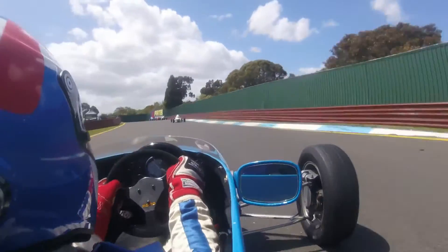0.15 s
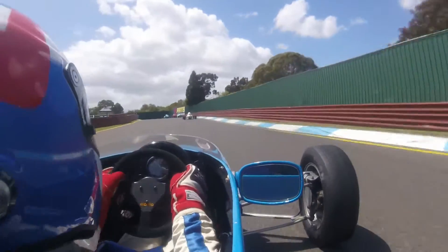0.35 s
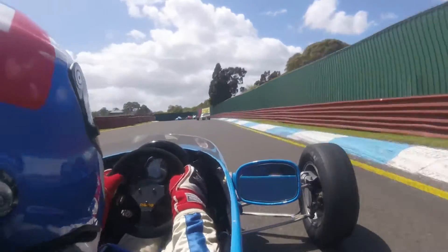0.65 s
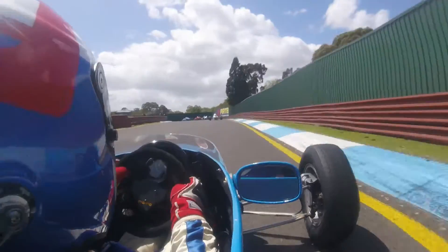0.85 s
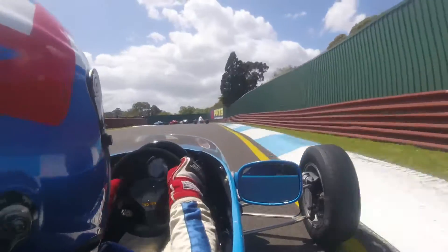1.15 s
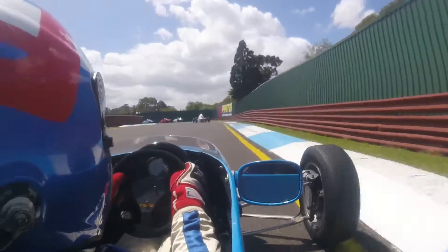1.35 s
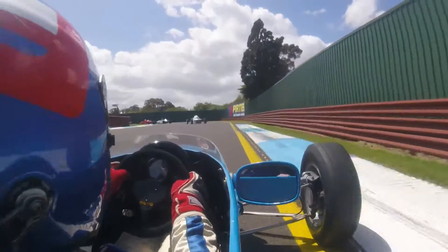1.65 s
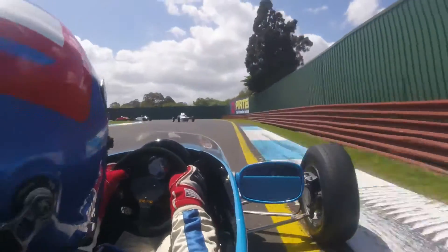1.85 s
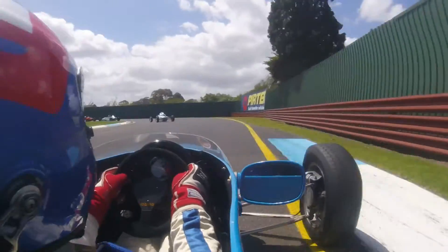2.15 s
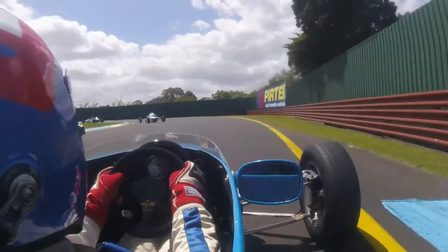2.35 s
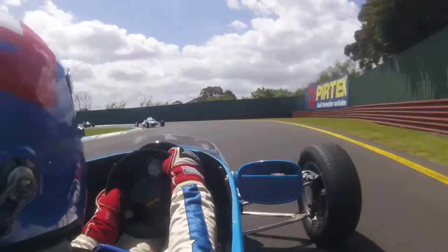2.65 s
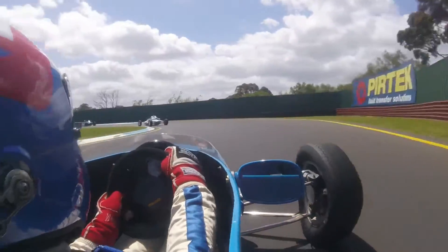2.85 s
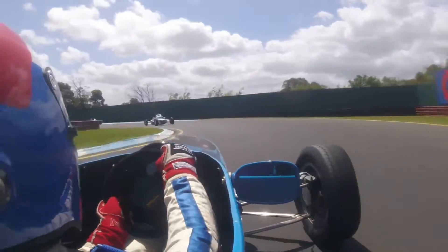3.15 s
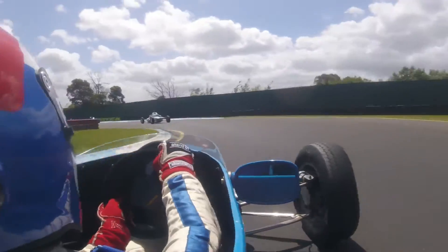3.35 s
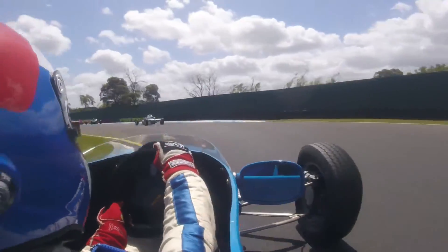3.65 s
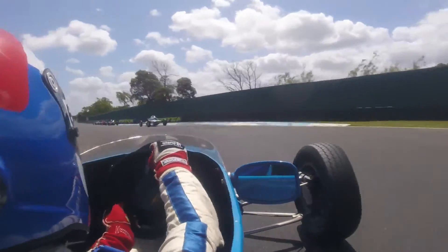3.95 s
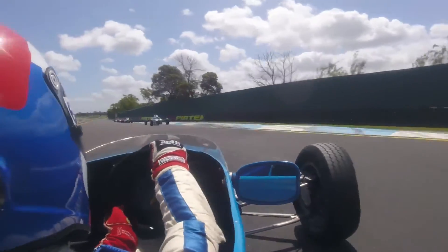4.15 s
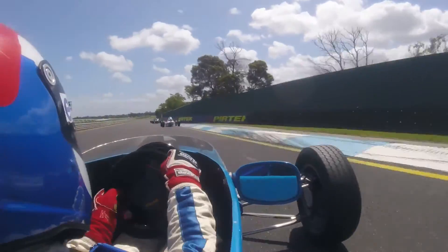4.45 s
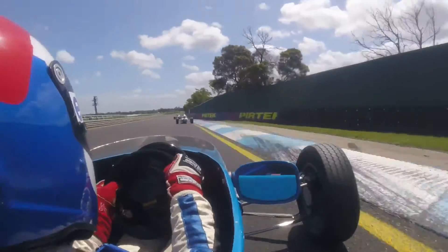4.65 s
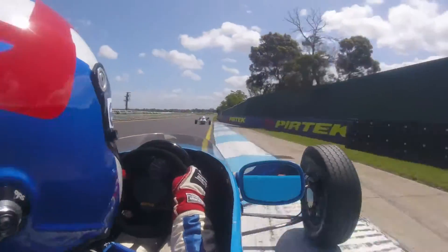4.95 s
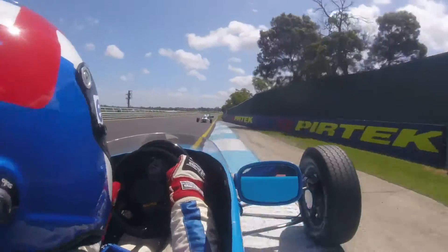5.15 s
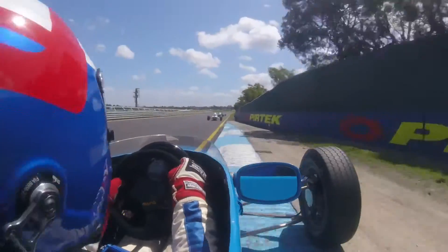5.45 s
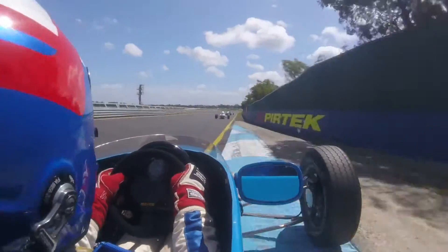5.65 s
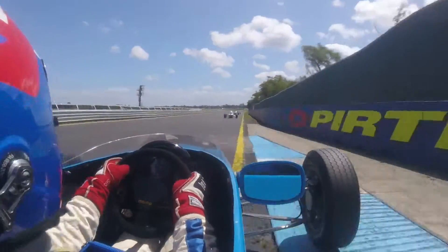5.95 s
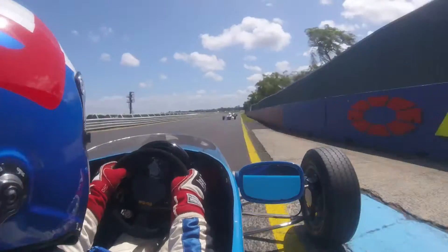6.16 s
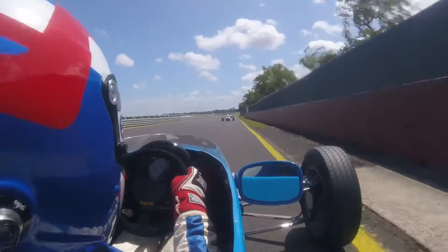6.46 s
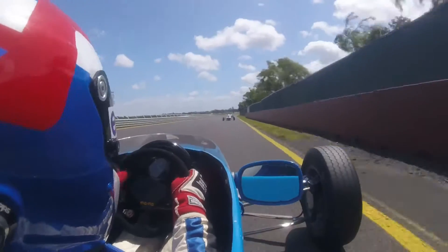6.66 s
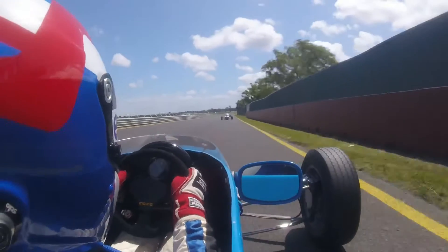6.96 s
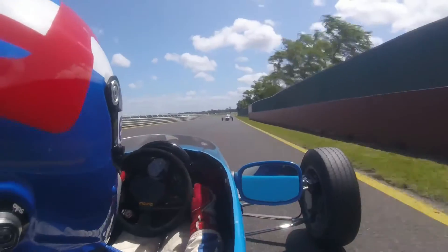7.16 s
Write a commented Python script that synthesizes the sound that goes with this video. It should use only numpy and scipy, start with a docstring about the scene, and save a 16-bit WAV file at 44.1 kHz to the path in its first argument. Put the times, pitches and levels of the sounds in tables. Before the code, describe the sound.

From a microphone on the car behind the driver, a dense engine drone dominates, with valve clatter, wind and tyre rush. Revs drop into a burbling lull, recover and hold through the bend, then pull upward unevenly. Rough kerb bursts and dull thuds shake the chassis before the smoother straight, where a thin high whistle strengthens.

```python
"""Cockpit of a four-cylinder open-wheel racing car: into a bend, out over the kerb, onto the straight.
From the start: exhaust boom at the firing rate, fluttering in the airstream, with the engine's other orders;
noise bands for valve clatter, wind and rush; a faint resonant whistle. As the revs fall, random pops burble in
the pipe. Pulling out, one gear tone whines; clicks ring chassis modes as knocks; noise bursts make the kerb's
rumble and howl. Last, the whistle swells."""
import sys
import numpy as np
from scipy import signal
from scipy.io import wavfile

SR = 44100
rng = np.random.default_rng(int(sys.argv[2]) if len(sys.argv) > 2 else 0)


def unload_wav(signal):
    """Save mono or channel-first audio to the path in sys.argv[1] as 16-bit WAV at rate SR, clipped to [-1, 1]."""
    wavfile.write(
        sys.argv[1],
        SR,
        np.round(np.clip(np.atleast_2d(signal).T, -1, 1) * 32767).astype(np.int16),
    )


N = 321930

# Engine speed. Each row: time in seconds, firings per second.
SPEED_CURVE = [(0.0, 198.7), (0.24, 204.1), (0.28, 202.0), (0.81, 216.8), (1.06, 215.5), (1.28, 207.5),
               (1.36, 196.4), (1.48, 198.4), (1.79, 175.4), (1.83, 176.8), (1.89, 172.7), (1.95, 162.2),
               (2.03, 163.8), (2.34, 149.1), (2.44, 141.3), (2.62, 136.7), (2.68, 144.8), (2.79, 144.8),
               (2.88, 141.5), (2.97, 154.4), (3.25, 157.1), (3.33, 155.0), (3.98, 155.7), (4.29, 154.0),
               (4.43, 159.5), (4.7, 156.7), (4.9, 168.5), (5.02, 162.7), (5.1, 164.9), (5.16, 174.2),
               (5.2, 176.0), (5.31, 167.3), (5.37, 167.1), (5.45, 176.2), (5.57, 174.0), (5.77, 178.6),
               (5.83, 182.7), (5.98, 182.5), (6.08, 186.4), (6.14, 196.9), (6.2, 200.6), (6.24, 190.3),
               (6.53, 197.7), (7.3, 212.1)]
# Engine load, set by the throttle. Each row: time in seconds, load in dB.
LOAD_CURVE = [(0, 1), (1.22, -1.5), (1.8, -7), (2.4, -8.5), (2.72, -3), (3.0, -2.2), (3.7, -2.1), (4.5, 0),
              (5.09, 3.5), (5.15, -1.5), (5.55, -2.5), (6.08, -0.5), (6.22, -3.5), (7.3, -0.5)]

# Exhaust boom before flutter. Each row: time in seconds, level in dB.
BOOM_CURVE = [(0, -5), (0.55, -6.5), (1.5, -6), (1.84, -8), (2.0, -12.5), (2.33, -16), (2.6, -23.5),
              (2.66, -13), (2.91, -13.5), (2.99, -8.7), (5.0, -8.5), (6.8, -6.5), (7.3, -9)]
# Deepest sags of the boom. Each row: time in seconds, depth from 0 to 1 (limited later), half-width in seconds.
DEEP_SAGS = [(0.108, .52, 0.02), (0.204, 0.48, 0.025), (1.411, 0.35, .013), (1.729, 0.65, 0.019),
             (1.782, 0.7, 0.0057), (1.948, .57, 0.01), (2.015, 0.77, 0.0056), (2.281, 0.8, 0.011),
             (2.384, .71, 0.011), (2.461, .95, 0.011), (5.909, .53, .011), (6.289, .55, 0.0088),
             (6.359, 0.57, 0.012), (6.448, 1, 0.023), (6.535, 0.93, .012), (6.75, 0.44, 0.013),
             (6.833, .72, 0.0085), (6.897, 0.77, 0.0083), (7.126, 0.7, 0.009), (7.292, 0.47, 0.015)]
# Lesser sags: one chance per slot, random depth up to the maximum, only above a firing rate.
SAG_SLOT_S, SAG_MAX_DEPTH, SAG_HALF_WIDTH_S, SAG_MIN_FIRING_HZ = 0.12, 0.35, 0.013, 166

# Growl at twice the firing rate, before flutter. Each row: time in seconds, level in dB.
GROWL_CURVE = [(0, -25.5), (0.33, -24), (0.6, -39.5), (0.88, -24), (1.15, -30.5), (1.42, -22.5),
               (2.0, -34.5), (2.59, -30.5), (2.68, -24), (2.94, -21.5), (3.03, -25.5), (4.35, -27),
               (4.7, -31.5), (5.8, -36.5), (6.2, -27.5), (7.3, -30.5)]
# Other orders at 0 dB load. Each row: multiple of the firing rate, then level in dB at each tabulated speed.
ORDER_LEVELS_DB = [(0.5, -35, -38, -30.5, -41.5), (1.5, -29, -26, -39, -47), (2.5, -37, -40.5, -38, -54),
                   (3.0, -44, -38.5, -30, -30.5), (3.5, -52, -47, -38, -54), (4.0, -33, -34.5, -53.5, -37),
                   (4.5, -36, -44.5, -53, -47), (5.0, -42.5, -44, -39, -39),
                   (5.5, -50, -53.5, -42.5, -57.5), (6.0, -62, -40.5, -38.5, -44),
                   (7.0, -52, -37, -50.5, -52), (8.0, -58, -55.5, -49.5, -54),
                   (9.0, -40.5, -48.5, -53.5, -50.5), (10.0, -65, -57.5, -59, -61),
                   (11.0, -68, -60.5, -56.5, -54.5), (12.0, -73, -59.5, -51.5, -58),
                   (13.0, -72, -56.5, -61.5, -68.5), (15.0, -60, -56.5, -60.5, -59)]
# Speeds for those level columns. Each entry: firings per second.
ORDER_TABLE_SPEEDS_HZ = [135, 151.8, 175.8, 203.3]
# Intake resonance, lifting any order that passes. One row: centre in Hz, half-width in Hz, lift in dB.
INTAKE_RESONANCE = (842, 16, 3.5)
# First kerb ridges rock the engine on its mounts. One row: time in seconds, half-width in seconds, level in dB.
MOUNT_ROCKING = (4.58, 0.14, -23.5)
# Orders 3 and 6 follow a share of the growl's swing about its usual level.
GROWL_SHARE, GROWL_USUAL_DB = 0.55, -28
# Independent swell of each order.
WAVER_DB, WAVER_HZ = 1.0, 3.0

# Valve clatter. Each row: time in seconds, level in dB.
CLATTER_CURVE = [(0, -46.5), (0.5, -45.5), (0.95, -42), (1.28, -43.5), (1.42, -45.5), (1.93, -51),
                 (2.4, -45.5), (2.62, -45), (2.75, -41), (3.7, -41.5), (5.08, -41.5), (5.16, -43),
                 (5.6, -45), (6.08, -41.5), (6.2, -47.5), (7.3, -40.5)]
# Valve noise spectrum. Each row: frequency in Hz, relative density in dB per Hz.
VALVE_SPECTRUM = [(1500, -14.5), (3000, 3.5), (4300, -2.5), (5200, 8), (5800, -1), (6700, -9), (7800, -42),
                  (9200, -26.5), (10500, -44.5)]
# Ringing castings. Each row: frequency in Hz, width in Hz, relative gain in dB.
CASTING_MODES = [(3100, 50, -9), (3700, 40, -5.5), (4970, 20, -8), (5170, 11, 13.5), (5500, 25, -1.5),
                 (5440, 41, 4), (5740, 88, -6.5), (6300, 53, -19.5)]
# Share of ringing. Each row: firings per second, level in dB relative to the clatter.
RINGING_SHARE = [(143, -1), (155, -9), (175, -13), (212, -9)]

# Wind gusts. Each row: time in seconds, peak level in dB added to the steady wind as amplitude.
WIND_GUSTS = [(1.0, -32.5), (1.72, -34), (2.92, -25.5), (4.65, -27.5), (5.5, -19), (6.33, -26),
              (7.2, -25.5)]
# Wind buffet spectrum. Each row: frequency in Hz, relative density in dB per Hz.
BUFFET_SPECTRUM = [(25, -11.5), (50, 1), (90, -0.5), (140, 3.5), (220, 15), (330, -18), (600, -15.5),
                   (1500, -44)]
# Steady wind level at the cruising firing rate; gust half-width.
CRUISE_FIRING_HZ, WIND_DB, WIND_DB_PER_DOUBLING, GUST_HALF_WIDTH_S = 175, -27.5, 3.5, 0.11

# Air and tyre rush spectrum. Each row: frequency in Hz, relative density in dB per Hz.
RUSH_SPECTRUM = [(100, -1.5), (250, 2), (450, 3), (700, 1), (1000, -6), (1500, -10.5), (2200, -13.5),
                 (3200, -21), (4200, -23.5), (6000, -37.5), (8000, -72), (10000, -55)]
# Rush level at the cruising firing rate and 0 dB load.
RUSH_DB, RUSH_DB_PER_LOAD_DB, RUSH_DB_PER_DOUBLING = -29, 0.76, 2

# Whistle: start and duration of its swell, level before and after.
WHISTLE_S, WHISTLE_RISE_S, WHISTLE_FAINT_DB, WHISTLE_DB = 6.2, 0.5, -63.5, -51.5

# Exhaust pipe resonances. Each row: frequency in Hz, width in Hz, relative gain in dB.
PIPE_MODES = [(235, 14, 9), (299, 49, 11.5), (500, 40, -6), (760, 78, -27.5)]
# Overrun burble: peak time, level there, slopes before and after.
BURBLE_S, BURBLE_DB, BURBLE_RISE_DB_PER_S, BURBLE_FALL_DB_PER_S = 2.42, -26, 25, 46.5

# Gear whine: span, fade at each end, level at 0 dB load, tone cycles per firing.
WHINE_START_S, WHINE_END_S, WHINE_FADE_S, WHINE_DB = 2.95, 5.9, 0.25, -50
WHINE_CYCLES_PER_FIRING = 17.87

# Knocks. Each row: time in seconds, then click strengths for thud, clack and tick in dB.
KNOCK_EVENTS = [(3.569, -31, -31, -59), (4.123, -33, -23.5, -64), (4.644, -22.5, -23.5, -43),
                (5.11, -19.5, -45, -23), (5.329, -11.5, -37, -49), (5.485, -15, -37, -59),
                (6.465, -22, -31, -57), (7.027, -18.5, -20.5, -56)]
# Chassis modes. Each row: frequency in Hz, gain in dB, 60 dB decay time in seconds.
CHASSIS_MODES = [(271, 1.5, 0.028), (325, 0, 0.13), (358, -15.5, 0.063), (1050, -15.5, .05),
                 (1255, -0.5, 0.049), (1500, -8, .04), (1950, -13, 0.023)]

# Kerb stretches. Each row: start in seconds, end in seconds, rumble level in dB, howl level in dB.
KERB_STRETCHES = [(4.46, 4.684, -29, -35.5), (4.76, 5.096, -34, -41), (5.805, 5.873, -48, -29.5),
                  (5.903, 6.06, -44, -33.5)]
# Kerb rumble spectrum. Each row: frequency in Hz, relative density in dB per Hz.
KERB_SPECTRUM = [(50, -1), (80, 6), (130, -18), (240, -3.5), (400, -5), (700, -12.5), (1200, -17),
                 (1800, -29), (3000, -17)]
KERB_ATTACK_S, KERB_RELEASE_S = 0.023, 0.04

CUTOFF_HZ = 10800


def from_db(db):
    """Decibels to amplitude."""
    return 10 ** (np.asarray(db) / 20)


def rms_one(x):
    """Scale to rms 1."""
    return x / np.sqrt(np.mean(x ** 2) + 1e-20)


def curve(rows):
    """Interpolate a two-column time curve at every sample."""
    time_s, value = np.transpose(rows)
    return np.interp(np.arange(N) / SR, time_s, value)


def drift(rate_hz):
    """Low-passed random drift with spread 1, computed at every 40th sample."""
    r = np.exp(-2 * np.pi * rate_hz * 40 / SR)
    white = rng.standard_normal(N // 40 + 2002)
    slow = signal.lfilter([1], [1, -2 * r, r * r], white)[2000:]   # drop the filter's settling
    return np.interp(np.arange(N) / 40, np.arange(len(slow)), rms_one(slow))


def bell(centre_s, half_width_s):
    """Gaussian hump of height 1."""
    return np.exp(-np.minimum(((np.arange(N) / SR - centre_s) / half_width_s) ** 2, 50))


def resonance(x, hz, width_hz):
    """Two-pole resonance with peak gain 1."""
    r = np.exp(-np.pi * width_hz / SR)
    numerator = np.array([1, 0, -1]) * (1 - r * r) / 2
    return signal.lfilter(numerator, [1, -2 * r * np.cos(2 * np.pi * hz / SR), r * r], x)


def ring(clicks, hz, t60_s):
    """Decaying sine, starting height about 1 per unit click."""
    r, w = np.exp(-np.log(1000) / (t60_s * SR)), 2 * np.pi * hz / SR
    return signal.lfilter([0, np.sin(w)], [1, -2 * r * np.cos(w), r * r], clicks + 1e-18)


def banded_noise(spectrum, patchy_db):
    """Third-octave noise bands, each flickering independently; total rms 1."""
    hz, density_db = np.transpose(spectrum)
    edges_hz = 22 * 2 ** (np.arange(28) / 3)
    out, white = 0, rng.standard_normal((2, N))
    for k, (low, high) in enumerate(zip(edges_hz, edges_hz[1:])):
        band_db = np.interp(np.log(low * high) / 2, np.log(hz), density_db, left=-90, right=-90)
        band_filter = signal.butter(2, [low, high], "band", fs=SR, output="sos")
        band = signal.sosfilt(band_filter, white[k % 2])   # neighbours use different noise
        out = out + band * from_db(band_db + patchy_db * drift(40))
    return rms_one(out)


def narrow_noise(hz, width_hz):
    """Noise through the same resonance twice; rms 1."""
    once = resonance(rng.standard_normal(N), hz, width_hz)
    return rms_one(resonance(once, hz, width_hz))


def speed_doublings(firing_hz):
    """Octaves of firing rate above cruising."""
    return np.log2(firing_hz / CRUISE_FIRING_HZ)


def flutter(firing_hz):
    """Airstream flutter: gain 1 with smooth notches at deep sags and at random lesser ones at speed."""
    sags = list(DEEP_SAGS)
    for slot, (place, size) in enumerate(rng.random((80, 2))):
        s = SAG_SLOT_S * (slot + place)
        if s * SR < N and firing_hz[int(s * SR)] > SAG_MIN_FIRING_HZ:
            sags.append((s, SAG_MAX_DEPTH * size, SAG_HALF_WIDTH_S))
    gain = np.ones(N)
    for s, depth, half_width_s in sags:
        gain *= 1 - np.clip(depth, 0, 0.97) * bell(s, half_width_s)
    return gain


def exhaust(firings, sag, uneven=0.041, jitter_rad=0.04):
    """Near-sine boom; firings vary slightly in strength and spacing."""
    wave = np.sqrt(2) * np.cos(2 * np.pi * firings + jitter_rad * drift(40))
    return from_db(curve(BOOM_CURVE)) * sag * (1 + uneven * drift(40)) * wave


def orders(firings, firing_hz, sag, rough=0.26, growl_sag_power=3.0, wobble_firings=0.0085):
    """Whole orders come from every firing, half orders from unequal cylinders; balance shifts with revs."""
    load_db, growl_db = curve(LOAD_CURVE), curve(GROWL_CURVE)
    crank = firings + wobble_firings * drift(21)   # uneven turning blurs high orders most
    deep_sag = sag ** growl_sag_power

    def partial(k):
        """One order, with random in-phase and quadrature roughness."""
        angle = 2 * np.pi * k * crank
        if k > 2:   # lower orders keep a fixed phase to the firings
            angle = angle + rng.uniform(0, 2 * np.pi)
        in_phase = (1 + rough * drift(14)) * np.cos(angle)
        return np.sqrt(2) * (in_phase + rough * drift(13) * np.sin(angle))

    growl = from_db(growl_db) * deep_sag * partial(2)
    rock_s, rock_half_width_s, rock_db = MOUNT_ROCKING
    rocking = from_db(rock_db) * bell(rock_s, rock_half_width_s) * partial(0.5)
    out = growl + rocking
    intake_hz, intake_half_width_hz, intake_db = INTAKE_RESONANCE
    for k, *levels_db in ORDER_LEVELS_DB:
        order_db = load_db + np.interp(firing_hz, ORDER_TABLE_SPEEDS_HZ, levels_db)
        if k in (3, 6):
            order_db = order_db + GROWL_SHARE * (growl_db - GROWL_USUAL_DB)
        order_db = order_db + intake_db / (1 + ((k * firing_hz - intake_hz) / intake_half_width_hz) ** 2)
        order_db = order_db + WAVER_DB * drift(WAVER_HZ)
        order_sag = deep_sag if 1 < k < 4 else np.sqrt(sag)
        out = out + from_db(order_db) * order_sag * partial(k)
    return out


def valve_train(firings, firing_hz, pulsing=0.13, uneven_db=0.5):
    """Bright clatter pulsing with the firings, partly ringing in the castings."""
    share = from_db(np.interp(firing_hz, *np.transpose(RINGING_SHARE)))
    beat = (1 + pulsing * np.cos(2 * np.pi * firings)) * from_db(uneven_db * drift(71))
    taps = beat * rng.standard_normal(N)
    ringing = sum(from_db(db) * resonance(taps, hz, width_hz) for hz, width_hz, db in CASTING_MODES)
    clatter = beat * banded_noise(VALVE_SPECTRUM, patchy_db=1.57)
    mix = (clatter + share * rms_one(ringing)) / np.hypot(1, share)   # share leaves the power about equal
    return from_db(curve(CLATTER_CURVE)) * mix


def wind(firing_hz):
    """Low buffeting that grows with engine speed and swells in gusts."""
    steady = from_db(WIND_DB + WIND_DB_PER_DOUBLING * speed_doublings(firing_hz))
    gusts = sum(from_db(db) * bell(s, GUST_HALF_WIDTH_S) for s, db in WIND_GUSTS)
    return (steady + gusts) * banded_noise(BUFFET_SPECTRUM, patchy_db=3.0)


def rush(firings, firing_hz, pulsing=0.23):
    """Air and tyre noise grows with revs and load; intake air makes it throb with the firings."""
    level_db = RUSH_DB + RUSH_DB_PER_LOAD_DB * curve(LOAD_CURVE)
    level_db = level_db + RUSH_DB_PER_DOUBLING * speed_doublings(firing_hz)
    throb = 1 + pulsing * np.cos(2 * np.pi * firings)
    return from_db(level_db) * banded_noise(RUSH_SPECTRUM, patchy_db=1.58) * throb


def whistle(hz=5255, width_hz=36, flicker_db=2.0):
    """Air sings unsteadily in a narrow resonance: faint, then stronger on the straight."""
    moments_s = [WHISTLE_S, WHISTLE_S + WHISTLE_RISE_S]
    level_db = np.interp(np.arange(N) / SR, moments_s, [WHISTLE_FAINT_DB, WHISTLE_DB])
    return from_db(level_db + flicker_db * drift(9)) * narrow_noise(hz, width_hz)


def burble(firings, low_hz=150, muffle_hz=1000):
    """Throttle shut: uneven combustion knocks the pipe with random strength at each firing."""
    since_s = np.arange(N) / SR - BURBLE_S
    level_db = BURBLE_DB + np.minimum(BURBLE_RISE_DB_PER_S * since_s, -BURBLE_FALL_DB_PER_S * since_s)
    firing_clicks = np.diff(np.floor(firings), prepend=0)
    pops = firing_clicks * rng.standard_normal(N) + 1e-18
    pipe = sum(from_db(db) * resonance(pops, hz, width_hz) for hz, width_hz, db in PIPE_MODES)
    muffler = signal.butter(2, [low_hz, muffle_hz], "band", fs=SR, output="sos")
    return from_db(level_db) * rms_one(signal.sosfilt(muffler, pipe))


def gear_whine(firings, wander_rad=0.45):
    """Meshing teeth give one tone geared to the crank, smeared by backlash."""
    moments_s = [WHINE_START_S, WHINE_START_S + WHINE_FADE_S, WHINE_END_S - WHINE_FADE_S, WHINE_END_S]
    fade = np.interp(np.arange(N) / SR, moments_s, [0, 1, 1, 0])
    tone = np.sqrt(2) * np.cos(2 * np.pi * WHINE_CYCLES_PER_FIRING * firings + wander_rad * drift(15))
    return from_db(WHINE_DB + curve(LOAD_CURVE)) * fade * tone


def knocks(tick_hz=6500, tick_width_hz=6500):
    """Bumps thud in low chassis modes and clack in the panels; grit adds a sharp tick."""
    table = np.array(KNOCK_EVENTS)
    thud, clack, tick = np.zeros((3, N))
    at = np.round(table[:, 0] * SR).astype(int)
    thud[at], clack[at], tick[at] = from_db(table[:, 1:].T)
    body = 0
    for hz, db, t60_s in CHASSIS_MODES:
        body = body + from_db(db) * ring(thud if hz < 700 else clack, hz, t60_s)
    # undo most of the resonance's loss on a single click
    return body + resonance(tick, tick_hz, tick_width_hz) * SR / (np.pi * tick_width_hz)


def kerb_contact():
    """Rumble and howl gains: each stretch sets in, holds and lets go."""
    t, gains = np.arange(N) / SR, 0
    for start_s, end_s, *levels_db in KERB_STRETCHES:
        moments_s = [start_s, start_s + KERB_ATTACK_S, end_s, end_s + KERB_RELEASE_S]
        gains = gains + from_db(levels_db)[:, None] * np.interp(t, moments_s, [0, 1, 1, 0])
    return gains


def kerb(howl_hz=670, howl_width_hz=330, lumpy_db=2.2):
    """Ridged kerb shakes the chassis in lumps and makes the tyre howl."""
    rumble_gain, howl_gain = kerb_contact()
    rumble = banded_noise(KERB_SPECTRUM, patchy_db=3.0) * from_db(lumpy_db * drift(50))
    return rumble_gain * rumble + howl_gain * narrow_noise(howl_hz, howl_width_hz)


def scene(hunting_hz=0.2):
    """Sum all sources; engine sounds share one firing count."""
    firing_hz = curve(SPEED_CURVE)
    firings = np.cumsum(firing_hz + hunting_hz * drift(6)) / SR   # revs hunt slightly at random throughout
    sag = flutter(firing_hz)
    engine = exhaust(firings, sag) + orders(firings, firing_hz, sag) + valve_train(firings, firing_hz)
    air = wind(firing_hz) + rush(firings, firing_hz) + whistle()
    engine = engine + burble(firings) + gear_whine(firings)
    return (engine + air + knocks() + kerb())[None]


def record(dry):
    """Round the highest peaks, fade each end over 3 ms, cut the top steeply."""
    rounded = dry / (1 + (dry / 0.92) ** 16) ** (1 / 16)
    ends = signal.windows.tukey(N, 0.006 * SR / N)
    top_cut = signal.ellip(10, 0.1, 80, CUTOFF_HZ, fs=SR, output="sos")
    return signal.sosfilt(top_cut, rounded * ends)


dry = scene()
out = record(dry)
unload_wav(out)
```